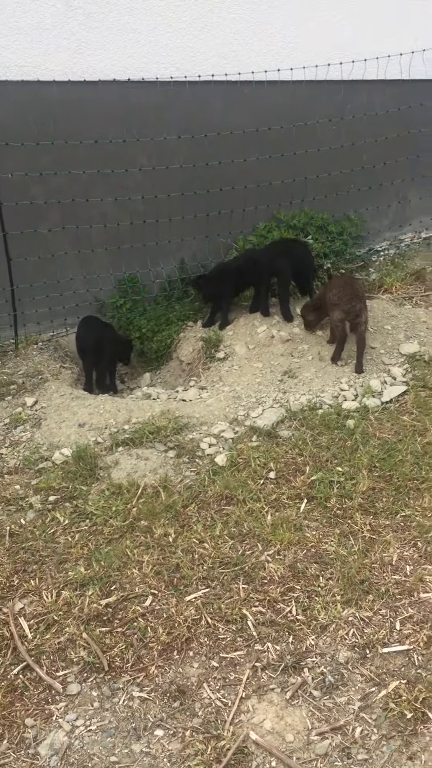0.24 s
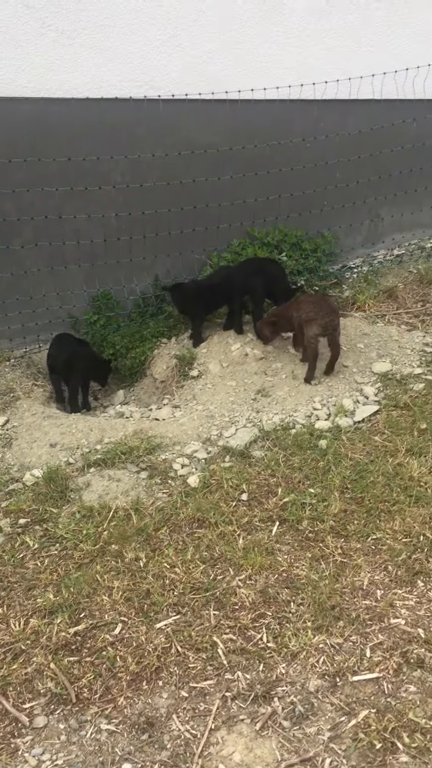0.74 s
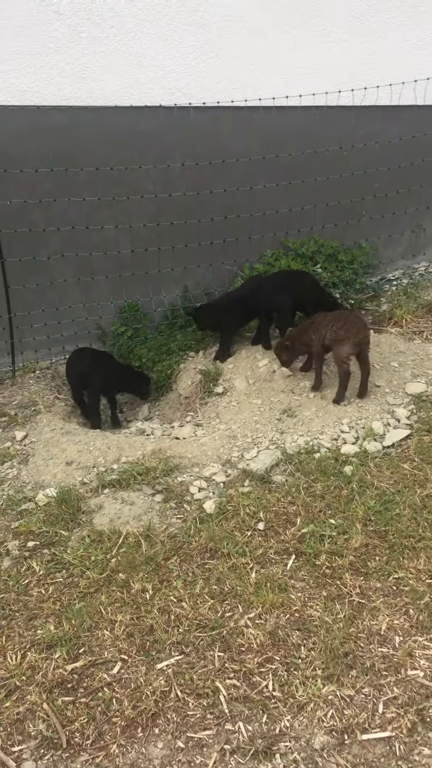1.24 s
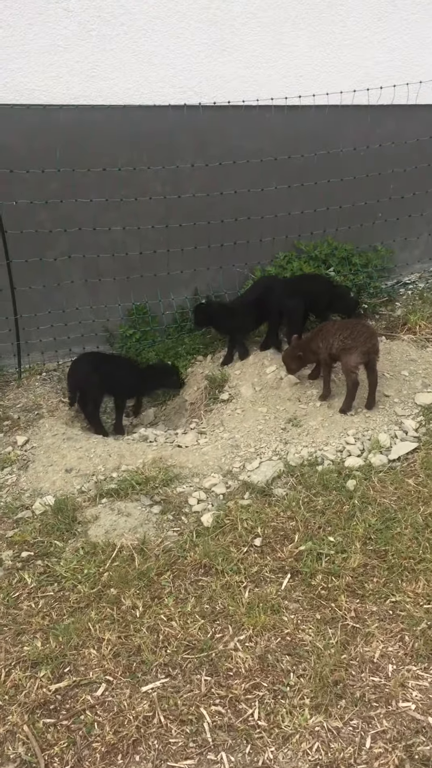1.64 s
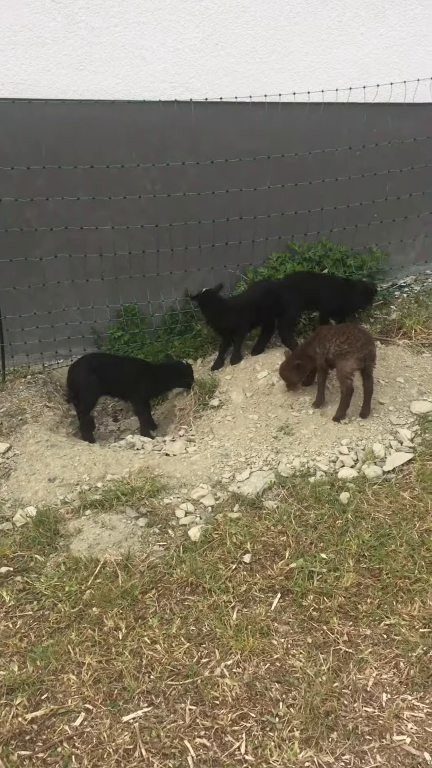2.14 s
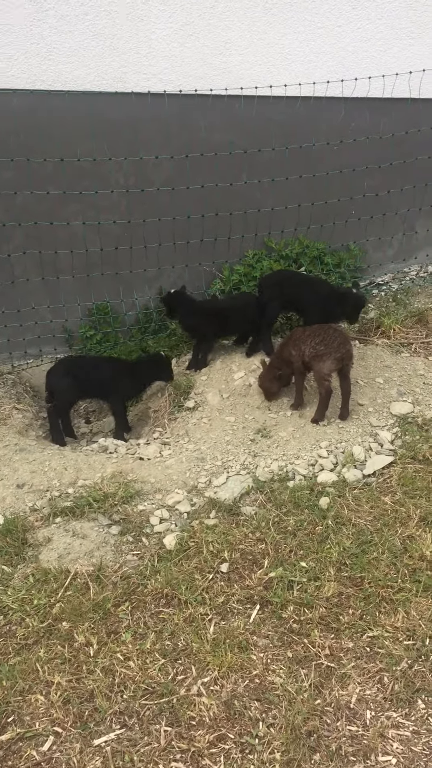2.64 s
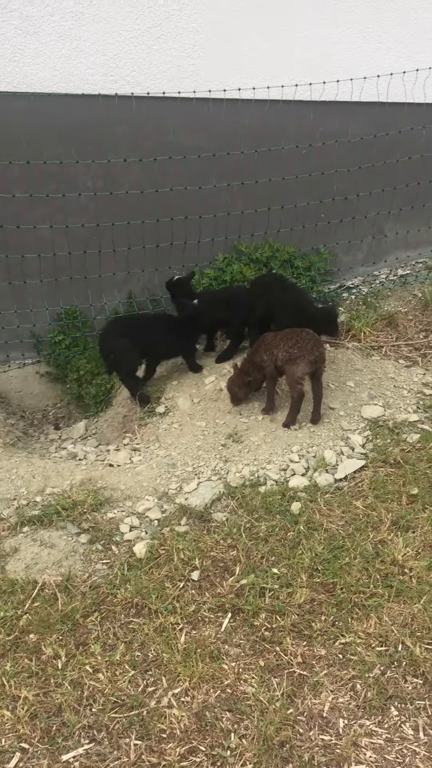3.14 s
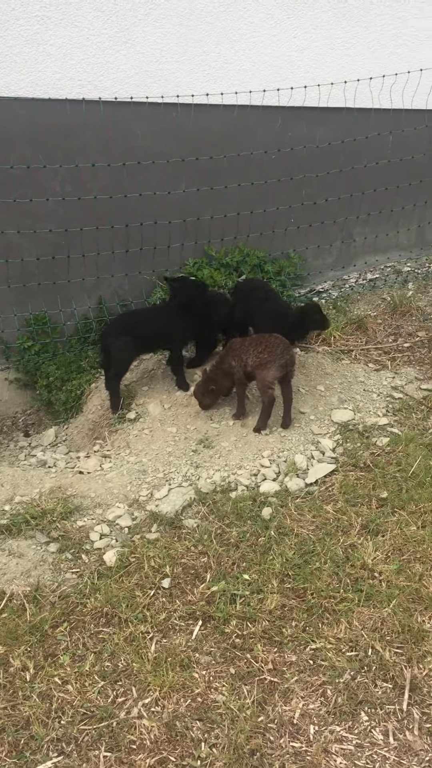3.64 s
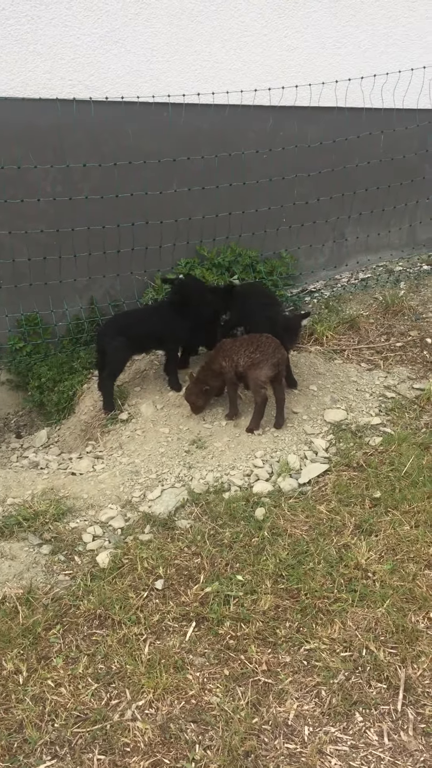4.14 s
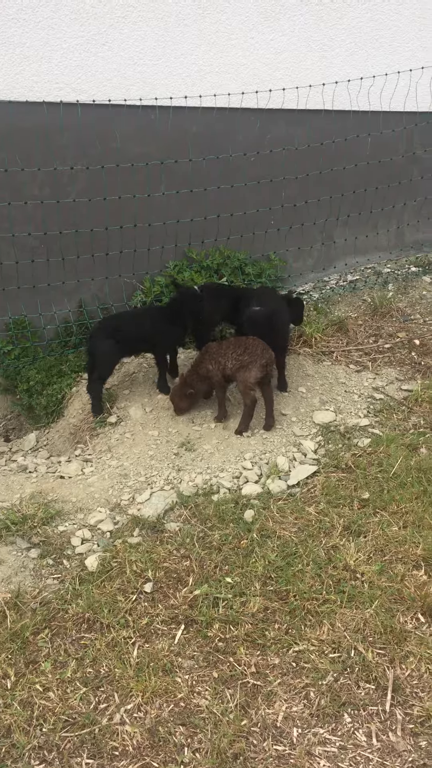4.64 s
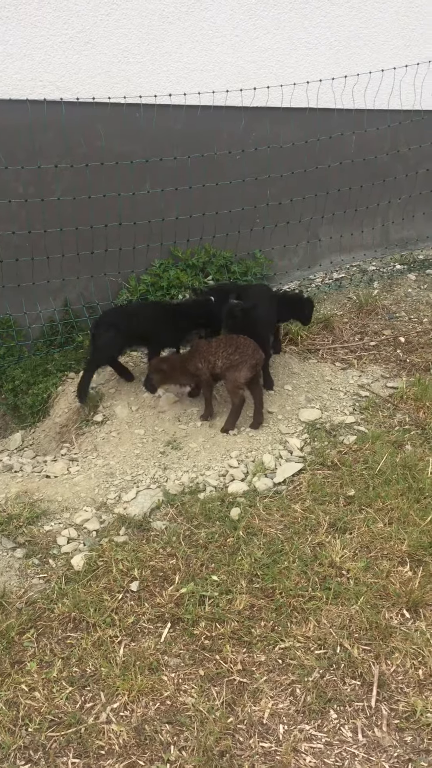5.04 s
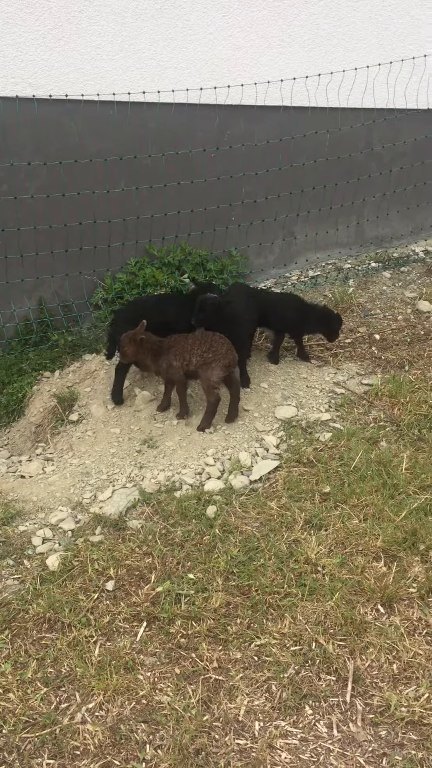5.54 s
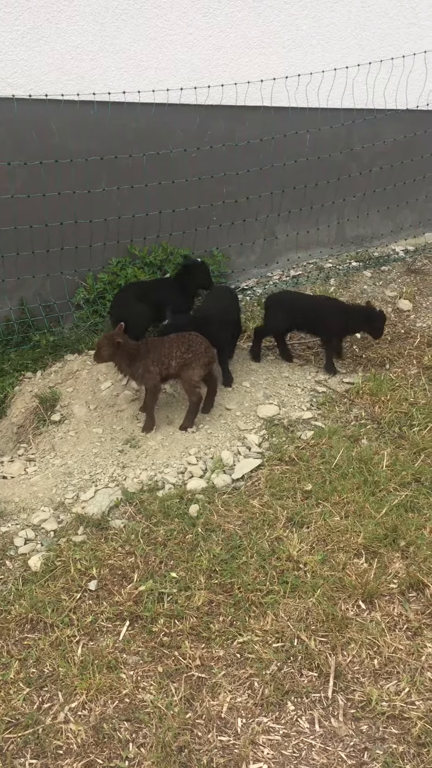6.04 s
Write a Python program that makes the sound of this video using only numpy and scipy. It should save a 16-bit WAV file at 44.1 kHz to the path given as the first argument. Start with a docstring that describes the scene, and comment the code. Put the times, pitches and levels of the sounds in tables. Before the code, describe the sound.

Quiet outdoor air with a soft low rumble and faint hiss. Distant small birds chirp and whistle, and a hoof scuffs sand with a dull thud. A small collar bell clinks, then one lamb gives a single nasal, trembling bleat that opens from a hum and sinks. Afterwards light sand shuffling and tiny grit snaps continue. Handheld microphone a few metres away, slight echo from a wall.

```python
"""A lamb bleats once outdoors: a closed-mouth hum opens into a bright, wavering call that sinks in pitch.
Glottal pulses and breath noise ring in resonances of throat and mouth. Struck modes make a small collar bell
and one hoof thud on a sandy mound; shaped noise makes scuffs in sand, short resonant bursts the snaps of grit.
Far birds are gliding tones, the air a low rumble and a hiss; a wall and the ground send back echoes."""
import sys
import numpy as np
from scipy import signal
from scipy.fft import rfft, irfft, next_fast_len
from scipy.io import wavfile
from scipy.ndimage import uniform_filter1d

SR = 44100
rng = np.random.default_rng(int(sys.argv[2]) if len(sys.argv) > 2 else 0)


def to_wav(s):
    """Save 16-bit WAV."""
    ch = np.atleast_2d(s).T  # columns
    pcm = np.round(np.clip(ch, -1, 1) * 32767)  # PCM
    wavfile.write(sys.argv[1], SR, pcm.astype(np.int16))


N = 277389
TIME = np.arange(N) / SR


def from_db(db):
    """Decibels to gain."""
    return 10 ** (np.asarray(db) / 20)


def rms_one(x):
    """Scale to unit rms."""
    return x / np.sqrt(np.mean(x ** 2) + 1e-20)


def in_time(rows):
    """Draw each column of an automation curve at every sample."""
    s, *columns = np.transpose(rows)
    return [np.interp(TIME, s, column) for column in columns]


def swell(s, half):
    """A bell-shaped rise and fall of height 1."""
    return np.exp(-.5 * ((TIME - s) / half) ** 2)


def cut(x, hz, kind, order=2):
    """Butterworth low- or high-pass."""
    sections = signal.butter(order, min(hz, .45 * SR), kind, fs=SR, output="sos")
    return signal.sosfilt(sections, x + 1e-18)


def skirt(x, hz, kind, order=2):
    """A steep edge without delay, filtered both ways so that all bands of a pulse arrive together."""
    forward = cut(x, hz, kind, order=order)
    return cut(forward[::-1], hz, kind, order=order)[::-1]


def notch(x, hz, sharpness=8):
    """Swallow one narrow band."""
    b, a = signal.iirnotch(hz, sharpness, fs=SR)
    return signal.lfilter(b, a, x)


def drift(rate_hz):
    """Smooth random wander of rms 1, no faster than about the given rate."""
    return rms_one(cut(rng.standard_normal(N), rate_hz, "low"))


def noise(spectrum):
    """Noise of a given colour, rms 1."""
    hz, db = np.transpose(spectrum)
    size = next_fast_len(N, real=True)
    log_hz = np.log(np.fft.rfftfreq(size, 1 / SR) + 1)
    gain = from_db(np.interp(log_hz, np.log(hz), db))
    white = rng.standard_normal(size)
    return rms_one(irfft(rfft(white) * gain, size)[:N])


def resonate(x, modes, flutter_db=None, alternate=True):
    """Parallel resonances, of alternating sign or in step; with flutter each swells and fades on its own."""
    out = 0
    for k, (hz, width, db) in enumerate(modes):
        r = np.exp(-np.pi * width / SR)
        poles = [1, -2 * r * np.cos(2 * np.pi * hz / SR), r * r]
        gain = from_db(db + flutter_db * drift(26.0) if flutter_db else db)
        sign = (-1) ** k if alternate else 1
        ringing = signal.lfilter([1, 0, -1], poles, x + 1e-18) * (1 - r * r) / 2
        out = out + sign * gain * ringing
    return out


def strike(blows, modes):
    """Each blow sets every mode ringing as a decaying sine; the blow also tilts the upper modes."""
    s, blow_db, upper_db = np.transpose(blows)
    out = 0
    for k, (hz, db, t60) in enumerate(modes):
        clicks = np.full(N, 1e-18)
        clicks[(s * SR).astype(int)] = from_db(blow_db + db + upper_db * (k > 0))
        r, w = np.exp(-np.log(1000) / (t60 * SR)), 2 * np.pi * hz / SR
        out = out + signal.lfilter([0, np.sin(w)], [1, -2 * r * np.cos(w), r * r], clicks)
    return out


def even(x, size=900):
    """Hold the level near 1 over a few voice cycles."""
    power = uniform_filter1d(uniform_filter1d(x * x, size), size)
    return x / np.sqrt(np.abs(power) + 1e-9 * np.mean(x * x))


# Colours of the low rumble and the far hiss. Each row: frequency in Hz, relative density in dB per Hz.
RUMBLE_COLOUR = [(12, -84), (20, -17.5), (50, -6.5), (75, 3), (96, -2), (140, -13.5), (173, -8),
                 (224, -16.5), (274, -27.5), (330, -30), (430, -67), (730, -120)]
HISS_COLOUR = [(150, -26.5), (250, 1), (308, -4.5), (360, -2), (393, -5.5), (429, -5.5), (476, -9),
               (576, -5), (1060, -3), (1160, -6.5), (2020, -8.5), (2280, -12), (3520, -16), (14400, -24.5),
               (16000, -22)]
# Rumble fader. Each row: time in seconds, level in dB.
RUMBLE_LEVEL = [(0, -62), (3.3, -60.5), (3.7, -65), (4.2, -60.5), (6.29, -66.5)]
HISS_DB = -70


def air(lumpy_db=3.5):
    """Outdoor air: a low rumble whose level wanders in lumps, and the smooth hiss of the far surroundings."""
    rumble_db, = in_time(RUMBLE_LEVEL)
    lumpy = rms_one(noise(RUMBLE_COLOUR) * from_db(lumpy_db * drift(23.3)))
    return from_db(rumble_db) * lumpy + from_db(HISS_DB) * noise(HISS_COLOUR)


# Falling, warbled chirps, all on one glide. Each row: start in seconds, level in dB before flicker and warble.
CHIRPS = [(0.109, -70), (0.887, -64.5), (1.516, -66), (4.695, -76.5), (5.544, -71)]
CHIRP_S, CHIRP_FROM_HZ, CHIRP_TO_HZ = .078, 4400, 3210   # the glide under the warble
WARBLE_PER_S, WARBLE_DEPTH_HZ = 30, 352   # mean rate
# Quick upward flicks. Each row: start in seconds, length in seconds, middle pitch in Hz, level in dB before flicker.
FLICKS = [(0.277, 0.019, 3750, -57), (0.398, 0.011, 3920, -61.5), (0.841, 0.065, 3350, -71),
          (1.183, 0.02, 3250, -65.5), (1.236, 0.021, 3450, -69), (1.653, 0.027, 3130, -69),
          (1.704, 0.021, 3800, -66), (1.726, 0.014, 3900, -59.5)]
FLICK_RISE_HZ = 800
# Slurred whistles and thin peeps of songbirds. Each row: start in seconds, length in seconds, start pitch in Hz,
# end pitch in Hz, arch of the pitch between them in Hz, level in dB before flicker.
WHISTLES = [(.01, 0.061, 2217, 1570, -27, -69.5), (0.236, .1, 2830, 3610, 198.5, -65.5),
            (0.303, 0.13, 2400, 2054, 63, -66), (0.479, 0.11, 2400, 2136, 26, -67.5),
            (0.611, 0.11, 2173, 1890, -56.5, -63), (0.731, 0.11, 1963, 2083, -45.5, -61.5),
            (0.903, 0.093, 2000, 2205, -50, -67), (0.965, 0.16, 3150, 2174, 237, -62),
            (1.278, 0.051, 2404, 2234, 15, -65), (1.504, .036, 8200, 8040, 6, -72),
            (1.701, 0.0086, 8200, 8300, 5, -60.5), (1.781, 0.097, 3100, 3410, -104, -74.5),
            (4.294, 0.07, 2520, 2660, 788, -65.5), (4.54, 0.052, 2870, 3070, 220, -63.5),
            (5.148, .18, 2117, 2485, 55, -78.5)]
PITCH_WAVER, FLICKER_DB = 0.0085, 2.8   # unsteady pitch of every note (share); flicker of the level on the way


def birds():
    """Far chirps, flicks and whistles: each a gliding tone under a soft arch of level."""
    out = np.zeros(N)
    unsteady = 1 + PITCH_WAVER * drift(120)
    warble_phase = 2 * np.pi * np.cumsum(WARBLE_PER_S * (1 + 0.17 * drift(37))) / SR

    def add(s, length, start_hz, end_hz, arch_hz, db, depth_hz=0):
        """One note; a warble also swings its level, loudest where the warble rises."""
        u = np.linspace(0, 1, int(length * SR))
        at = max(int(s * SR), 0) + np.arange(len(u))
        arch = 4 * u * (1 - u)
        glide_hz = start_hz + (end_hz - start_hz) * u + arch_hz * arch
        hz = glide_hz * unsteady[at] + depth_hz * np.sin(warble_phase[at])
        broken = 1 + np.tanh(depth_hz / 550) * np.cos(warble_phase[at])
        tone = np.sin(2 * np.pi * np.cumsum(hz) / SR)
        out[at] += from_db(db) * broken * np.sqrt(arch) * tone

    for s, db in CHIRPS:
        add(s, CHIRP_S, CHIRP_FROM_HZ, CHIRP_TO_HZ, 0, db, WARBLE_DEPTH_HZ)
    for s, length, hz, db in FLICKS:
        add(s, length, hz - FLICK_RISE_HZ / 2, hz + FLICK_RISE_HZ / 2, 0, db)
    for whistle in WHISTLES:
        add(*whistle)
    return out * from_db(FLICKER_DB * drift(46))


# While the lambs jostle, light shuffling and random grit fill in.
JOSTLE_FROM_S, JOSTLE_TO_S = 3.9, 6.1
SHUFFLE_DB, SHUFFLE_SWING_DB = -86.5, 4
# Hooves slide through sand. Each row: centre in seconds, half length in seconds, rms level in dB at the centre.
SLIDES = [(0.723, 0.042, -62.5), (1.982, 0.041, -64), (3.694, 0.015, -66.5), (3.774, 0.018, -63.5),
          (4.062, 0.022, -72), (4.227, 0.021, -73.5), (4.338, 0.012, -64), (4.927, 0.016, -70.5),
          (5.11, 0.033, -70)]
# Colour of rushing sand. Each row: frequency in Hz, relative density in dB per Hz.
SAND_COLOUR = [(200, -16), (700, -1), (2000, 1), (4500, -2), (6500, -0.5), (9000, 0.5), (10500, -6),
               (13000, 2.5), (16000, -4)]


def scuffs(grain_db=3.0):
    """Sand grains rush in clumps under a sliding hoof; light shuffling goes on while the lambs jostle."""
    slide = sum(from_db(db) * swell(s, half) for s, half, db in SLIDES)
    jostling = (TIME > JOSTLE_FROM_S) * (TIME < JOSTLE_TO_S)
    shuffle = from_db(SHUFFLE_DB + SHUFFLE_SWING_DB * drift(18)) * jostling
    grains = rms_one(noise(SAND_COLOUR) * from_db(grain_db * drift(170)))
    return np.hypot(slide, shuffle) * grains


# Grit and dry stalks snap. Each row: start in seconds, peak level in dB, centre frequency in Hz.
SNAPS = [(0.597, -59, 5200), (2.017, -45, 7600), (2.2485, -45.5, 14660), (3.688, -52.5, 9500),
         (3.7736, -43.5, 12400), (4.321, -52, 3440), (4.337, -49, 1570), (4.344, -54, 3000),
         (5.0928, -48, 11400), (5.788, -53, 14700), (5.924, -49.5, 12000), (6.2337, -49.5, 13400)]
GRIT_COUNT, GRIT_DB, GRIT_SPREAD_DB, GRIT_HZ = 10, -60, 2, 10000   # fainter snaps at random moments


def snaps(width_share=0.21, body_db=-11, splinter=0.26, splinter_s=0.0025):
    """Each snap is one sharp crack and a few splinters in a broad resonance, with a duller body under it."""
    out = np.zeros(N + SR)
    t = np.arange(2048) / SR
    grit = []
    for _ in range(GRIT_COUNT):
        s = rng.uniform(JOSTLE_FROM_S, JOSTLE_TO_S)
        db = rng.normal(GRIT_DB, GRIT_SPREAD_DB)
        grit.append((s, db, GRIT_HZ * 2 ** rng.uniform(-0.55, 0.54)))
    for s, db, hz in SNAPS + grit:
        burst = (t == 0) + splinter * rng.standard_normal(len(t)) * np.exp(-t / splinter_s)
        tick = resonate(burst, [(hz, width_share * hz, 0), (1800, 2500, body_db)])
        start = int(s * SR)
        out[start:start + len(t)] += from_db(db) * tick / np.abs(tick).max()
    return out[:N]


# Close contacts of one hoof fall. Each row: start in seconds, level in dB, lift of the upper modes in dB.
HOOF_BLOWS = [(.7343, -53.5, 0), (.7375, -46, 0), (.757, -60, 0)]
# Modes of the hollow mound. Each row: frequency in Hz, gain in dB, t60 in seconds.
MOUND_MODES = [(240, -18, 0.095), (440, 4, 0.066), (490, -6, 0.044), (636, -3.5, 0.035)]


def hoof_thud():
    """A hoof lands on the hollow mound and sets its short, low modes ringing."""
    return strike(HOOF_BLOWS, MOUND_MODES)


# Bell strokes. Each row: start in seconds, level in dB, lift of the upper modes in dB (where the clapper lands).
BELL_STROKES = [(1.968, -50.5, -1.5), (2.095, -62, -5.5), (2.225, -67, -3), (2.4857, -58, 7.5),
                (2.664, -65, 17), (2.832, -50.5, 10.5), (3.325, -50.5, 11.5)]
# Modes of the bell. Each row: frequency in Hz, gain in dB, t60 in seconds.
BELL_MODES = [(1824, 1, 0.25), (4140, -2.5, 0.17), (6480, -16.5, 0.12), (7460, -15, 0.11),
              (8400, -32, 0.12), (10750, -19, 0.15), (11400, -19, 0.15), (13787, -24, 0.1)]


def collar_bell():
    """The clapper sets the modes of a small bell ringing; where it lands decides how bright the stroke is."""
    return strike(BELL_STROKES, BELL_MODES)


# The call rises, holds and sinks in one arch. Each row: time in seconds, pitch in Hz before the catches.
PITCH = [(2.44, 168.4), (2.48, 218.4), (2.56, 251.8), (2.625, 275), (2.68, 285), (2.735, 291.1),
         (2.765, 296.9), (2.92, 287.3), (3.03, 284.3), (3.08, 278.4), (3.15, 273.4), (3.255, 259.6),
         (3.28, 224.7), (3.32, 194.4)]
# A murmur, a quick opening, a slow swell and the release. Each row: time in seconds, effort in dB.
EFFORT = [(2.39, -86), (2.435, -63.5), (2.525, -53.5), (2.565, -36.5), (2.68, -34), (2.83, -32.5),
          (3.12, -32.5), (3.255, -34), (3.32, -47.5)]
# Catches of the throat make the call waver. Each row: centre in seconds, half length in seconds,
# added roughness from 0 to 1, pitch dip in Hz, treble lift in dB.
CATCHES = [(2.548, 0.022, 0.44, 5.7, 6), (2.688, 0.022, 0.15, 5, 3.5), (2.799, .01, 0.26, 11, 2.5),
           (2.854, 0.011, 0.43, 12.7, 5.5), (3.038, .013, 0.52, 15, 6.5), (3.195, 0.017, 0.58, 19.7, 3.5),
           (3.266, 0.011, 0.42, 17.6, -7)]
CATCH_LAG_S = 0.01667   # pitch and treble answer a catch this much later
FULL_EFFORT_DB = -31
ROUGH_CLEAR, ROUGH_WEAK, WEAK_BELOW_DB = 0.088, .7, 25   # at full effort; added this many dB below it
EDGE_DB, EDGE_FOLLOWS = -56, 0.48   # pressed treble at full effort; share of the effort's swing
PRESS_FROM_S, PRESS_S, UNPRESSED_DB = 2.656, 0.1, -10   # the treble builds as the lamb presses harder


def larynx():
    """Pitch, effort, roughness and treble level: the arch of the call, broken by catches of the throat."""
    (pitch,), (effort_db,) = in_time(PITCH), in_time(EFFORT)
    slack_db = effort_db - FULL_EFFORT_DB
    rough = ROUGH_CLEAR + ROUGH_WEAK * np.clip(-slack_db / WEAK_BELOW_DB, 0, 1)
    unpressed = np.clip(1 - (TIME - PRESS_FROM_S) / PRESS_S, 0, 1)
    edge_db = EDGE_DB + EDGE_FOLLOWS * slack_db + UNPRESSED_DB * unpressed
    for s, half, roughness, dip_hz, lift_db in CATCHES:
        answer = swell(s + CATCH_LAG_S, half)
        rough = rough + roughness * swell(s, half)
        pitch = pitch - dip_hz * answer
        edge_db = edge_db + lift_db * answer
    return pitch, effort_db, np.clip(rough, 0, 1), edge_db


# Hum through the nose, strongest before the mouth opens. Each row: time in seconds, rms level in dB.
HUM = [(2.28, -65), (2.45, -64), (2.485, -50), (2.61, -53.5), (2.71, -63.5), (2.97, -67.5), (3.06, -58),
       (3.28, -58), (3.315, -77)]
# Each row: time in seconds, jaw opening from 0 (half open) to 1 (wide open).
JAW = [(2.56, 0.02), (2.7, 0.01), (3.025, 0.01), (3.055, 0.36), (3.13, 0.03), (3.26, 0.94), (3.31, 0.03)]
# Mouth resonances, half open and wide open. Each row: frequency in Hz, width in Hz, gain in dB.
MOUTH_HALF = [(607, 147, 6.5), (792, 260, 4), (1550, 420, 0)]
MOUTH_WIDE = [(530, 330, 12.5), (814, 55.7, 6), (1095, 41, 24), (1760, 150, 12)]
# Throat resonances, relaxed and narrowed, and the high ones that pressed pulses reach.
# Each row: frequency in Hz, width in Hz, gain in dB.
THROAT_RELAXED = [(2100, 24, -1), (2256, 108, 15), (2673, 190, 10.5), (2841, 150, 8.5), (3315, 50, 5),
                  (3750, 320, -7), (4320, 480, -4), (5000, 490, -3)]
THROAT_NARROW = [(2400, 190, -1), (2920, 200, 8.5), (3280, 270, 7), (3640, 260, -0.5), (4450, 170, -16)]
EDGE = [(5570, 170, -0.5), (6360, 370, 0), (9000, 650, -3.5), (9650, 200, 0), (10150, 230, -7),
        (11400, 1900, -13.5), (13800, 1600, -15.5)]
# The throat narrows as the pitch sinks from the top.
TOP_PITCH_HZ, NARROW_AT_TOP, NARROW_PER_HZ = 281.4, 0.18, 0.0099
OPENS_S, NARROW_SHUT = 2.54, 0.3   # until the mouth opens it narrows only by this share
MOUTH_DB, MOUTH_FOLLOWS = -46, 0.75   # at full effort; share of the effort's swing
EDGE_JAW_DB = 6   # the treble gains this with the jaw wide open


def bleat(jitter=0.0296, shimmer_db=2.0, edge_rasp=1.0, mouth_rasp=0.16, flutter_db=4.5,
          half_notch_hz=5120, wide_notch_hz=5350):
    """Sharp glottal pulses ring in throat and mouth; roughness shakes their timing and strength."""
    pitch, effort_db, rough, edge_db = larynx()
    (hum_db,), (jaw,) = in_time(HUM), np.clip(in_time(JAW), 0, 1)
    narrow = np.clip(NARROW_AT_TOP + NARROW_PER_HZ * (TOP_PITCH_HZ - pitch), 0, 1)
    narrow = narrow * np.where(TIME < OPENS_S, NARROW_SHUT, 1)
    mouth_db = MOUTH_DB + MOUTH_FOLLOWS * (effort_db - FULL_EFFORT_DB)

    phase = 2 * np.pi * np.cumsum(pitch * (1 + jitter * rough * drift(139.5))) / SR
    # samples to the nearest closure of the folds
    offset = SR * np.angle(np.exp(1j * phase)) / (2 * np.pi * pitch)
    pulses = -rms_one(np.sinc(.8 * offset) * np.exp(-(offset / 8) ** 2))
    pulses = pulses * from_db(shimmer_db * rough * drift(360))
    puffs = np.exp(2 * np.cos(phase - .5))   # one a cycle
    turbulence = rms_one(rng.standard_normal(N) * puffs)

    # the throat's resonances start in step, so each closure of the folds cracks sharply
    source = pulses + .4 * rough * turbulence
    relaxed = resonate(source, THROAT_RELAXED, flutter_db, alternate=False)
    narrowed = resonate(source, THROAT_NARROW, alternate=False)
    throat = (1 - narrow) * relaxed + narrow * narrowed
    # steep skirts keep the valleys between the resonance groups dark
    throat = skirt(skirt(throat, 2035, "high", order=4), 4100, "low", order=3)

    source = pulses + mouth_rasp * rough * turbulence
    mouth = (1 - jaw) * resonate(source, MOUTH_HALF) + jaw * resonate(source, MOUTH_WIDE)
    mouth = skirt(cut(mouth, 325, "high", order=4), 1560, "low", order=3)

    source = pulses + (0.24 + edge_rasp * rough) * turbulence
    edge = skirt(resonate(source, EDGE), 5500, "high", order=4)

    voice = from_db(effort_db) * even(throat) + from_db(mouth_db) * even(mouth)
    voice = voice + from_db(edge_db + EDGE_JAW_DB * jaw) * even(edge)
    # a side pocket of the throat swallows one band; the jaw fades from a lower notch to a higher one
    voice = (1 - jaw) * notch(voice, half_notch_hz) + jaw * notch(voice, wide_notch_hz)
    # the nose passes only the lowest partials
    hum = from_db(hum_db) * (np.sin(phase) + from_db(-16) * np.sin(2 * phase))
    sounding = np.interp(TIME, [2.24, 2.28, 3.322, 3.33], [0, 1, 1, 0])
    return sounding * (voice + np.sqrt(2) * hum)


# Echoes off the ground and the wall. Each row: delay in seconds, level in dB.
ECHOES = [(.0104, -20.5), (.0189, -8), (.0316, -19.5)]


def yard(x, tail_db, t60):
    """A few distinct echoes and a thin, dull tail scattered by the surroundings."""
    echoes = sum(from_db(db) * np.interp(TIME - delay, TIME, x, left=0) for delay, db in ECHOES)
    tail = (cut(rng.standard_normal(N), 2100, "low") * np.exp(-np.log(1000) * TIME / t60))[:SR]
    tail = from_db(tail_db) * tail / np.linalg.norm(tail)
    return x + cut(echoes, 12000, "low", order=1) + signal.fftconvolve(x, tail)[:N]


def scene():
    """Lambs near the wall, birds farther off, air all round."""
    far_birds = yard(birds(), tail_db=-10.0, t60=1.0)
    underfoot = scuffs() + snaps()
    lamb = yard(hoof_thud() + bleat(), tail_db=-26.5, t60=0.7)
    mix = air() + far_birds + underfoot + collar_bell() + lamb
    return mix[None]


def record(dry):
    """The microphone loses the deepest bass; the top is cut steeply."""
    cutoff_hz = 15900
    thin = cut(dry, 39, "high", order=3)
    return signal.sosfilt(signal.ellip(10, .1, 70, cutoff_hz, fs=SR, output="sos"), thin)


dry = scene()
out = record(dry)
to_wav(out)
```